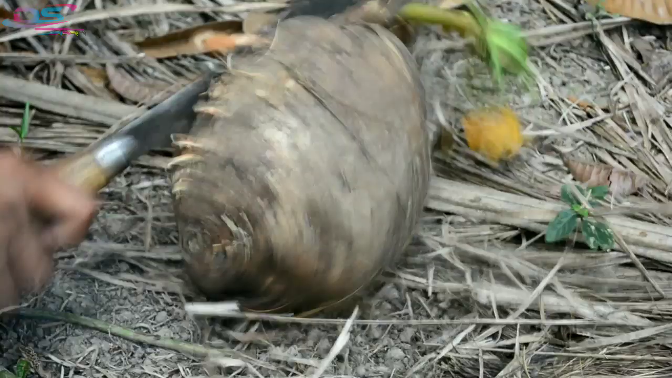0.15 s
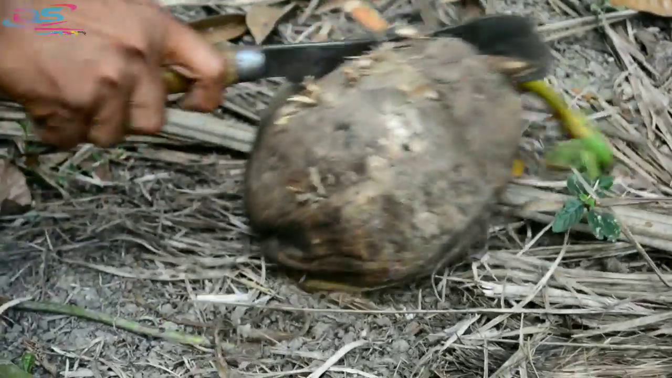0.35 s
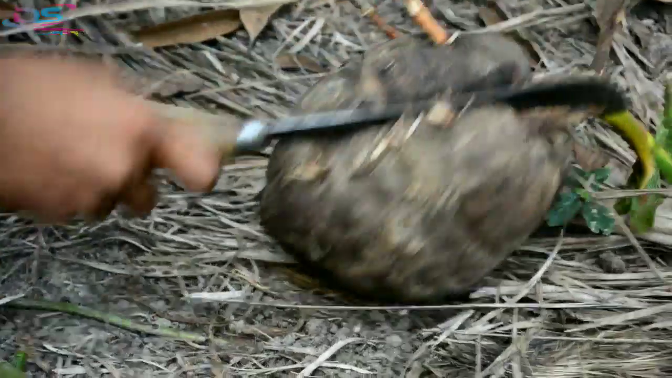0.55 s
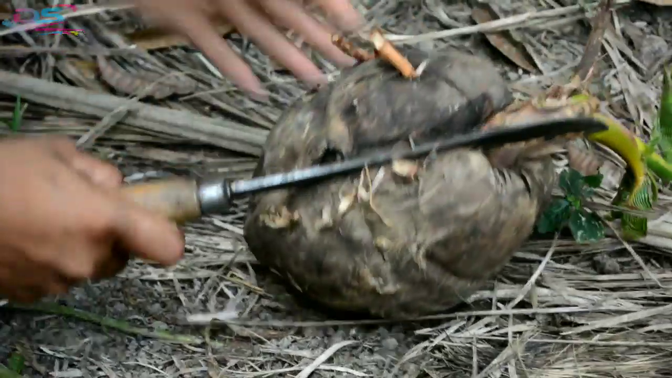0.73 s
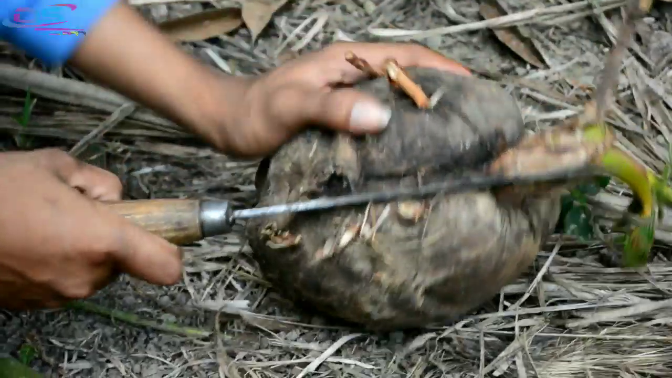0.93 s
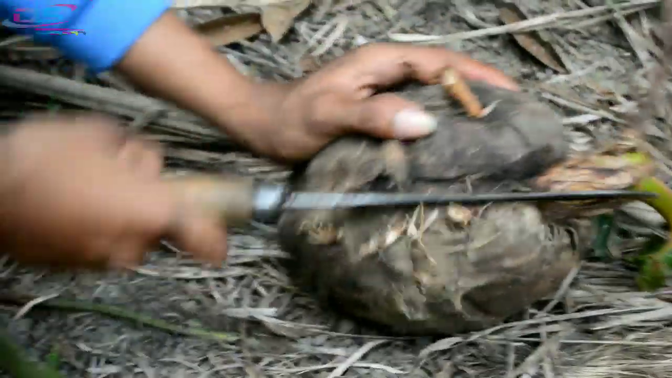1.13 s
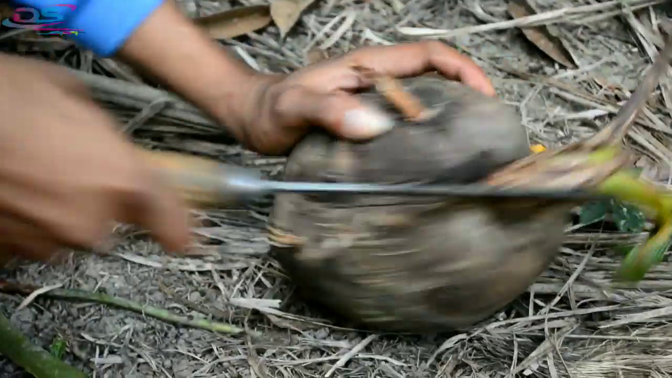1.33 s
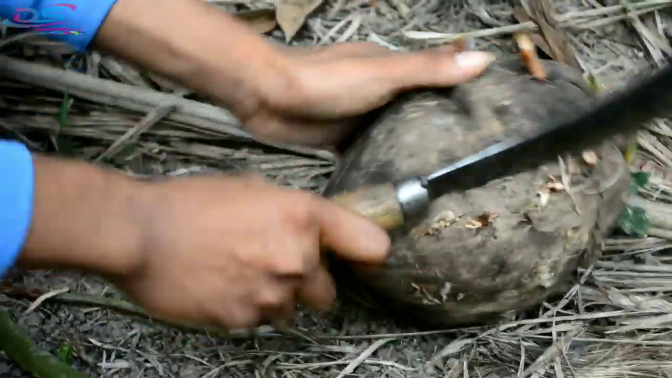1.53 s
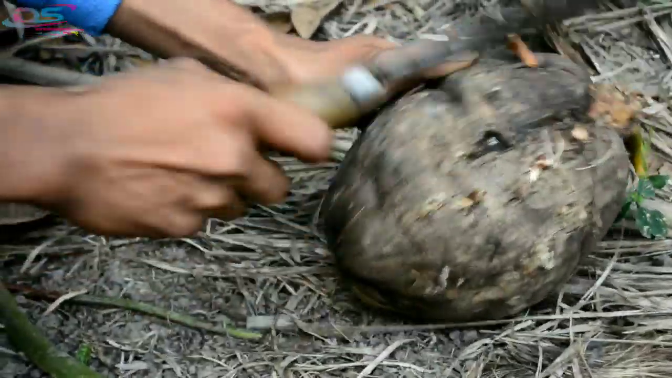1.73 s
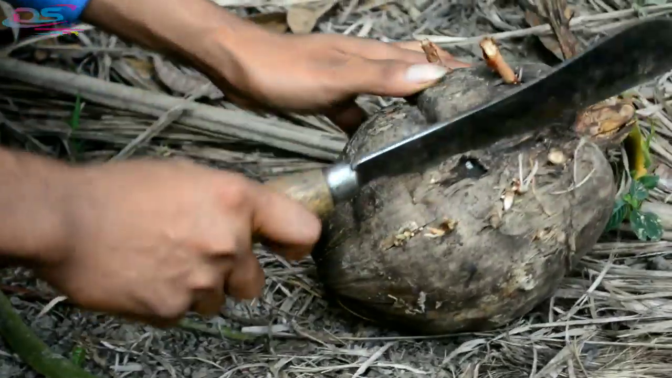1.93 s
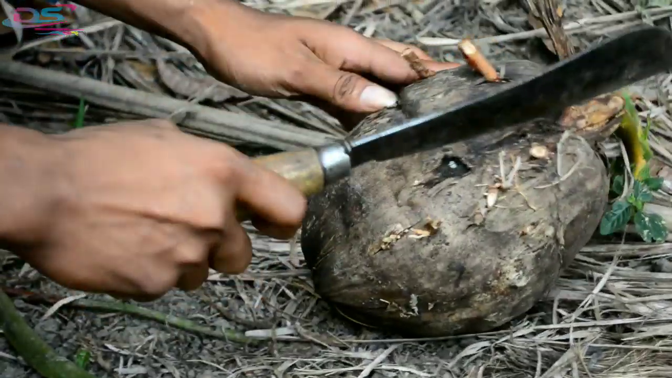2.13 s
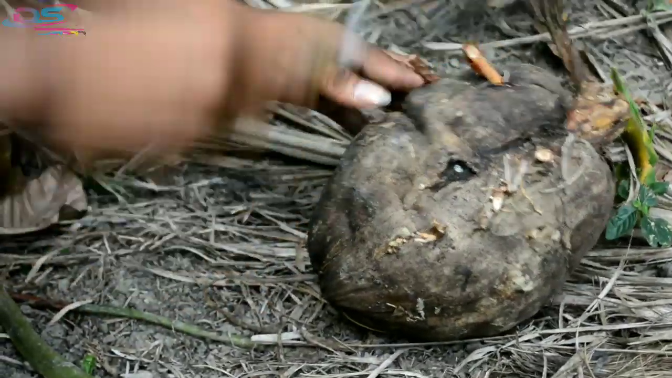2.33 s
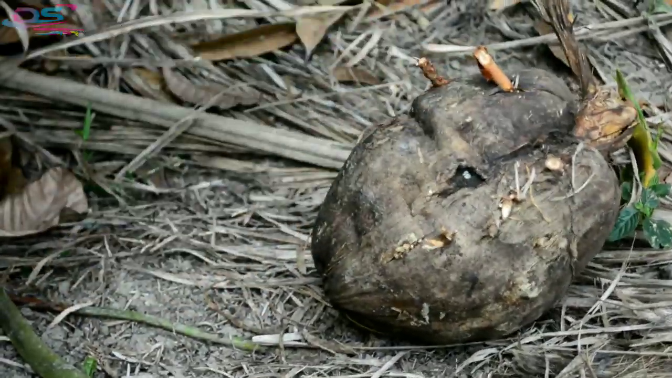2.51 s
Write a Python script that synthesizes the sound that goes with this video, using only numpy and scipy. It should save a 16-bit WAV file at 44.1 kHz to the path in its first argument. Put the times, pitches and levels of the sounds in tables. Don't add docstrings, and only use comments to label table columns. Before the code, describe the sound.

Hard, overloaded chop of a coconut on dry leaves, fibrous prising and crackling, one light blade tap

```python
import sys
import numpy as np
from scipy import signal
from scipy.fft import rfft, irfft
from scipy.io import wavfile
from scipy.ndimage import uniform_filter1d

SR = 44100
rng = np.random.default_rng(int(sys.argv[2]) if len(sys.argv) > 2 else 0)


def transcribe(u):
    v = np.clip(np.atleast_2d(u).T, -1, 1)
    q = np.round(v * 32767).astype(np.int16)
    wavfile.write(sys.argv[1], SR, q)


def boost_factor(decibels):
    exponent = np.asarray(decibels, float) / 20
    return 10 ** exponent


N = 114660
T = np.arange(N) / SR


def unit(x):
    return x / np.sqrt(np.mean(x ** 2))


def colour(x, points):
    hz, db = np.transpose(points)
    f = np.maximum(np.arange(2049) * SR / 4096, 1)
    log_gain = np.interp(np.log(f), np.log(hz), db) * np.log(10) / 20
    cepstrum = irfft(log_gain)
    cepstrum[1:2048] *= 2
    cepstrum[2049:] = 0
    response = irfft(np.exp(rfft(cepstrum)))
    return signal.fftconvolve(x, response)[:len(x)]


def ring(x, hz, t60):
    pole = np.exp((2j * np.pi * hz - np.log(1000) / abs(t60)) / SR)
    return signal.lfilter([1], [1, -pole], x).imag


def fade(t0, t60, rise=0.00027):
    since = np.maximum(T - t0, 0)
    return (1 - np.exp(-since / rise)) * boost_factor(-60 * since / t60)


def bump(t0, length, edge=0.13):
    nearest_end = np.minimum(T - t0, t0 + length - T)
    return np.clip(nearest_end / (edge * length), 0, 1)


def walk(rate):
    k = max(int(SR / rate), 2)
    smooth = uniform_filter1d(rng.standard_normal(N), k)
    return unit(uniform_filter1d(smooth, k))


def grains():
    per_s, spread_db = 9000, 2.5
    hit = rng.random(N) < per_s / SR
    height = boost_factor(spread_db * np.minimum(rng.exponential(size=N), 3))
    return unit(hit * rng.standard_normal(N) * height)


def hush():
    # pitch_hz, level_db
    air_tone = [(25, -22), (70, -8), (115, -2.5), (200, -6.5), (700, -5), (1600, -5.5), (5000, -16),
                (15500, -26.5)]
    # pitch_hz, side_against_mid_db
    air_width = [(100, -13.5), (1000, -4), (4000, -5.5), (10000, -3)]
    mid, side = [boost_factor(-56.5 + 1.0 * walk(1.28)) * unit(colour(rng.standard_normal(N), air_tone))
                 for _ in range(2)]
    return mid, colour(side, air_width)


def birds():
    # start_s, length_s, start_hz, end_hz, level_db
    whistles = [
        (-.08, 0.37, 5630, 5650, -59.5),
        (0.691, 0.18, 5950, 6000, -56),
        (1.16, 0.2, 6600, 7900, -53),
        (1.34, 0.13, 7560, 8300, -56),
        (1.392, 0.294, 8260, 8170, -60.5),
        (1.633, 0.33, 7350, 7680, -62),
    ]
    blur_hz = 170
    out = 0
    for t0, length, hz0, hz1, db in whistles:
        hz = np.interp(T, [t0, t0 + length], [hz0, hz1])
        tone = np.sin(2 * np.pi * np.cumsum(hz) / SR)
        out = out + boost_factor(db) * bump(t0, length, edge=0.3) * walk(2 * blur_hz) * tone
    return out


def snaps():
    # start_s, peak_db, ring_hz, click_db
    fibres = [(0.082, -33, 914, 8.5), (0.369, -45, 1290, 0), (0.404, -34.5, 1890, 4),
              (0.461, -34.5, 1680, 4), (0.472, -28, 1090, -8), (0.524, -34, 2120, -12),
              (.598, -34, 2300, -14), (.604, -42, 890, -13), (.655, -43.5, 2020, -12),
              (.902, -37, 1040, -10), (1.001, -44.5, 1550, -8), (1.123, -40, 1100, -22),
              (1.225, -31.5, 2050, -8), (1.3097, -27.5, 2530, 5), (1.322, -23.5, 1170, 1),
              (1.3263, -19, 1950, 2), (1.362, -31, 2500, -26), (1.384, -34, 2250, -17),
              (1.412, -49, 1605, -12), (1.433, -40, 1890, -18), (1.453, -45, 2380, -14),
              (1.46, -42, 2690, -14), (1.474, -39, 1990, -14), (1.485, -39, 2300, -14),
              (1.488, -33, 2200, -10), (1.507, -37, 1500, -11), (1.524, -28, 2097, -17),
              (1.529, -35, 2320, -10), (1.543, -24, 1570, -24), (1.554, -34, 2500, -14.5),
              (1.561, -36.5, 2080, -14), (1.584, -28.5, 1370, -11), (1.605, -35, 2580, -15),
              (1.608, -28, 1900, -22), (1.635, -26.5, 1420, -11), (1.641, -45, 2400, -7),
              (1.645, -45, 2300, -1.5), (1.694, -36, 1120, -19), (2.058, -43.5, 1500, 7.5),
              (2.209, -40, 895, 9.5), (2.2107, -39, 3550, -11), (2.341, -48.5, 1944, 0.5)]
    # pitch_hz, level_db
    click_tone = [(700, -18), (2000, 0), (6000, 6), (11000, -5.5), (15500, -26.5)]
    knock_t60_s, click_t60_s = .012, .004
    noise, out = rng.standard_normal(N), np.zeros(N)
    bright = unit(colour(noise, click_tone))
    tick = colour(1. * (np.arange(N) == 0), click_tone)[:2048]
    for t0, db, hz, click_db in fibres:
        i = slice(int(t0 * SR), int(t0 * SR) + 2048)
        kick = np.diff(fade(t0, .003, rise=.0001) * (1 + noise), prepend=0)[i]
        knock = ring(kick, hz, knock_t60_s) + 0.35 * ring(kick, 1.74 * hz, knock_t60_s / 2)
        decay = fade(t0, click_t60_s, rise=0.000202) + 0.11 * fade(t0, 0.018)
        click = decay[i] * bright[i]
        click = click / np.max(np.abs(click)) + 0.65 * tick / np.max(np.abs(tick))
        out[i] += boost_factor(db) * (knock / np.max(np.abs(knock)) + boost_factor(click_db) * click)
    return out


def swing():
    peak_s, rise_s = .226, .014
    rush = unit(ring(rng.standard_normal(N), 1000, 0.0045))
    return boost_factor(-48) * np.exp(-((T - peak_s) / rise_s) ** 2) * rush


def scuffs():
    # start_s, length_s, level_db, centre_hz
    brushes = [(0.36, 0.022, -44, 7900), (0.45, 0.027, -42, 7700), (0.5, 0.06, -50, 410),
               (0.62, 0.037, -52, 430), (0.46, 0.018, -42, 2200), (0.69, 0.029, -64, 7040),
               (0.925, 0.012, -50.5, 7200), (1.058, 0.031, -66, 8800), (1.322, 0.0052, -30, 1760),
               (1.326, 0.0082, -42, 5977), (1.2, 0.0119, -41, 650), (1.66, 0.0099, -47, 8000),
               (1.728, 0.016, -48, 1380), (1.73, 0.019, -50.5, 2840), (1.728, .02, -61, 9000),
               (0.274, .062, -32.5, 1700), (0.23, .015, -29, 1200), (.462, .02, -48, 1640),
               (1.46, 0.15, -55.5, 2800), (0.65, 0.29, -57.5, 740), (2.037, 0.014, -51.5, 8400),
               (2.084, 0.1, -51.5, 1900), (1.224, 0.062, -44, 2200), (1.265, 0.052, -43.5, 3200),
               (1.445, 0.055, -44.5, 2160), (1.55, 0.042, -44.5, 2150), (0.33, 0.034, -43.5, 1220),
               (1.513, 0.027, -43, 2550), (2.505, 0.017, -55, 6800), (2.576, 0.021, -59.5, 6100)]
    crush = np.diff(grains(), prepend=0)
    out = 0
    for t0, length, db, hz in brushes:
        t60 = 3.4 / hz
        brush = unit(ring(ring(crush, hz, t60), hz, t60))
        out = out + boost_factor(db) * bump(t0, length) * brush
    return out


def blows():
    # start_s, level_db, contact_s, crack_db, chatter_hz
    hits = [
        (0.2393, 9, 0.00649, -10, 1594),
        (1.9953, -7.5, 0.0014, -11.5, 1471),
    ]
    # scatter_db, scatter_t60_s, blade_ring_db
    aftermath = [
        (-28.5, 0.29, -51),
        (-32, 0.28, -44),
    ]
    # pitch_hz, level_db, t60_s
    slam_modes = [(38.2, -30, 0.087), (135, -17, 0.051), (266, -10.5, 0.037), (475, -9, .03),
                  (582.5, -11.5, 0.031), (917, -11, 0.03), (1115.5, -3.5, .028), (1400, -4.5, .02),
                  (1690, 4, .012), (2146, -1.5, 0.017), (2576, -13.5, 0.02), (2877, -8.5, 0.03),
                  (3285, -17, 0.028), (4420, -5.5, 0.012)]
    # pitch_hz, level_db, t60_s
    tap_modes = [(127, -22.5, 0.031), (309, -18.5, 0.035), (533, -17.5, 0.041), (707, -22, 0.048),
                 (1040, -6.5, 0.023), (1440, 1, 0.0082), (1803, -5, 0.014), (2283, -2.5, 0.016),
                 (2850, -12, 0.016), (3450, -7.5, 0.018), (3760, -9, .012), (4500, -10, 0.012),
                 (5640, -35.5, .01), (6200, -3.5, 0.0051)]
    # pitch_hz, level_db, t60_s
    blade_modes = [
        (11410, 0, .17),
        (8200, -12, .05),
    ]
    # pitch_hz, level_db
    crack_tone = [(400, -20.5), (1000, -6.5), (1650, 2), (2600, -2.5), (6000, -6.5), (12000, -11),
                  (15800, -33.5)]
    # pitch_hz, level_db
    scatter_tone = [(24, -52.5), (40, -33.5), (101, -12.5), (380, -22), (487, -13.5), (1580, -5.5),
                    (9790, -19.5), (14300, -33.5), (15800, -57.5)]
    crack_t60_s, ragged = 0.033, 0.41
    chatter_drop, chatter_drop_s = 0.36, 0.0013
    out = 0
    for hit, after, modes in zip(hits, aftermath, (slam_modes, tap_modes)):
        t0, db, contact, crack_db, chatter_hz = hit
        scatter_db, scatter_t60, blade_db = after

        push = bump(t0, contact) * (1 + ragged * rng.standard_normal(N))
        settling = np.exp(-np.maximum(T - t0, 0) / chatter_drop_s)
        bite_hz = chatter_hz * (1 + chatter_drop * settling) * (T >= t0)
        push = push * np.sin(2 * np.pi * np.cumsum(bite_hz) / SR) + 0.062 * push
        push = push / np.sqrt(np.sum(push ** 2) * contact * SR) * 3
        tick = boost_factor(-15.5) * bump(t0 + 0.3016 * contact, 0.0001)
        body = sum(boost_factor(g) * ring(push + tick, hz, d) * (-1) ** k for k, (hz, g, d) in enumerate(modes))

        strike = 1. * (np.arange(N) == int(t0 * SR))
        blade = sum(boost_factor(g) * ring(strike, hz, d) for hz, g, d in blade_modes)

        crack = unit(colour(rng.standard_normal(N), crack_tone))
        crack = crack * fade(t0, crack_t60_s * (contact / 0.0031) ** 0.17)

        scatter = unit(colour(grains() + rng.standard_normal(N), scatter_tone))
        scatter = scatter * boost_factor(0.71 * walk(98)) * fade(t0 + 0.0024, scatter_t60, rise=0.0027)

        loose = boost_factor(crack_db) * crack + boost_factor(scatter_db) * scatter + boost_factor(blade_db) * blade
        out = out + boost_factor(db) * (body + loose)
    return out


def husk_grating():
    # pitch_hz, level_db
    husk_tone = [(120, -43.5), (200, -19.5), (557, -2), (1410, 5.5), (2060, 4), (3200, -1), (6000, -6.5),
                 (7800, -45), (13200, -120)]
    out = 0
    for hz in 350 * 2. ** np.arange(6):
        octave = signal.butter(2, [hz / 1.41, hz * 1.41], "band", fs=SR, output="sos")
        band = signal.sosfilt(octave, grains())
        out = out + band * boost_factor(1.9 * walk(82))
    return unit(colour(out, husk_tone))


def rolling_and_prising():
    # start_s, effort_db, leaves_share_db
    effort = [(.34, -41, -0.5), (0.428, -44, -2), (.52, -45, 5), (.66, -47.5, -1), (0.699, -55, -2),
              (.9, -55, -4.5), (.95, -48.5, -3), (1.215, -56.5, 0.5), (1.23, -50.5, -0.5), (1.311, -42, 6),
              (1.4, -54.5, -5.5), (1.47, -47, -3), (1.55, -40.5, -1.5), (1.6, -42, -3.5), (1.62, -48, 0),
              (1.641, -44.5, -7), (1.66, -57.5, 0), (2.06, -62, 3.5), (2.14, -59.5, -5)]
    # pitch_hz, level_db
    leaf_tone = [(3000, -32), (5000, -14.5), (8500, -3.5), (11000, -12), (15000, -21.5)]
    at_s, efforts_db, shares_db = np.transpose(effort)
    effort_db, share_db = np.interp(T, at_s, efforts_db), np.interp(T, at_s, shares_db)
    leaves = unit(colour(grains(), leaf_tone)) * boost_factor(1.3 * walk(38.8) + share_db - 6)
    return bump(.25, 1.95, edge=.03) * boost_factor(effort_db) * (husk_grating() + leaves)


def scene():
    # pitch_hz, side_against_mid_db
    port_side = [(500, -26), (1500, -28), (4000, -29.5), (8000, -9), (14000, -14.5)]
    port_lag_s = .0004
    hush_mid, hush_side = hush()
    near = birds() + snaps() + swing() + scuffs() + blows() + rolling_and_prising()
    mid = near + hush_mid
    side = colour(np.roll(near, int(port_lag_s * SR)), port_side) + hush_side
    return np.array([mid + side, mid - side])


def top_cut(x):
    return signal.sosfilt(signal.butter(12, 15900, fs=SR, output="sos"), x)


def record(dry):
    # pitch_hz, level_db
    mic_tone = [(20, -18), (60, -3), (150, 0), (12000, -0.5), (16000, -9)]
    heard = [colour(x, mic_tone) for x in dry]
    return top_cut(np.clip(heard, -1, 1))


dry = scene()
out = record(dry)
transcribe(out)
```